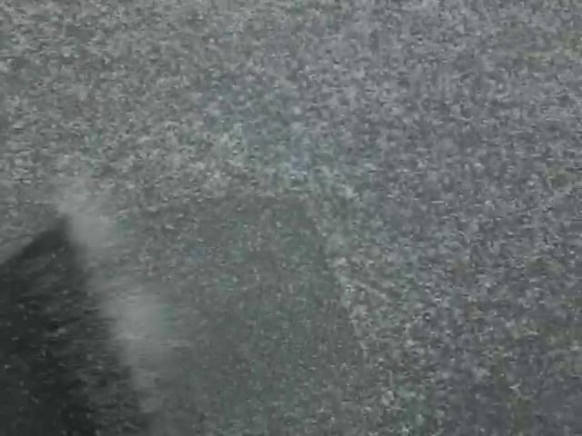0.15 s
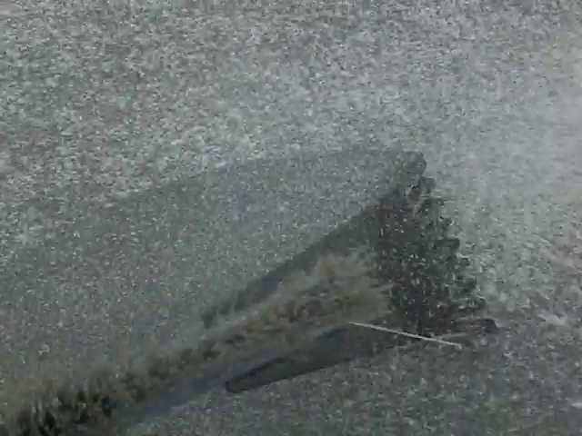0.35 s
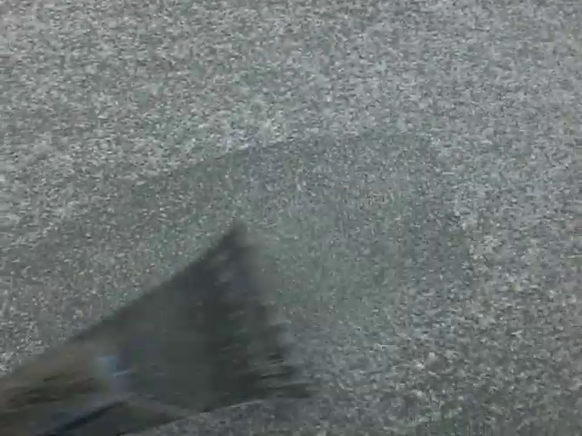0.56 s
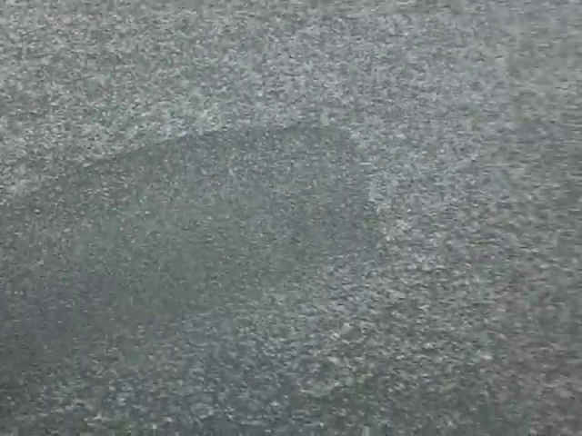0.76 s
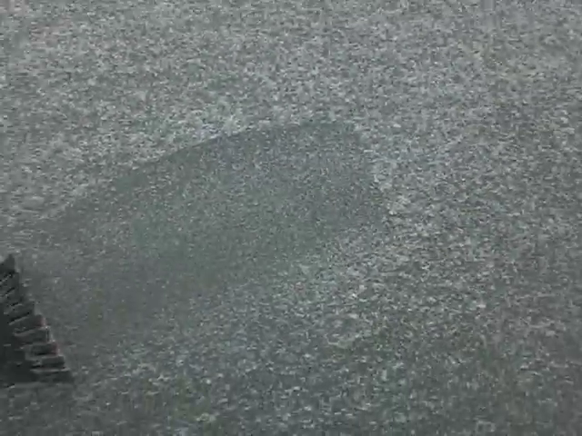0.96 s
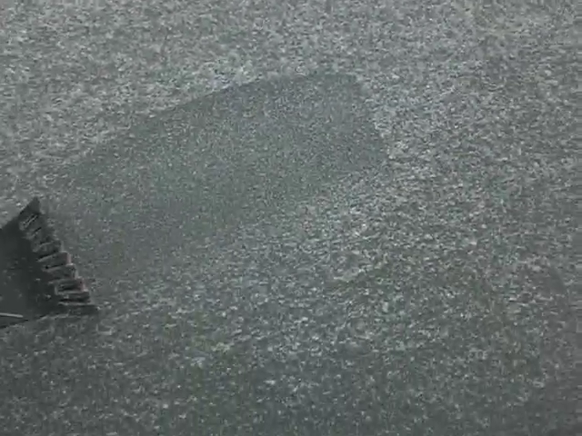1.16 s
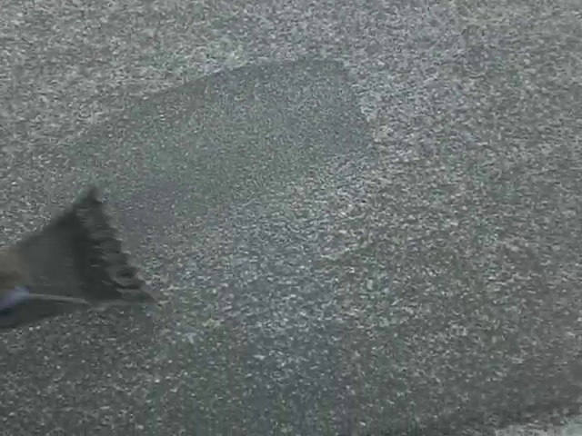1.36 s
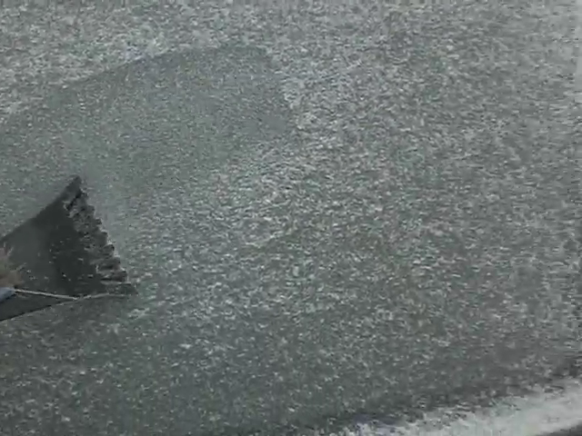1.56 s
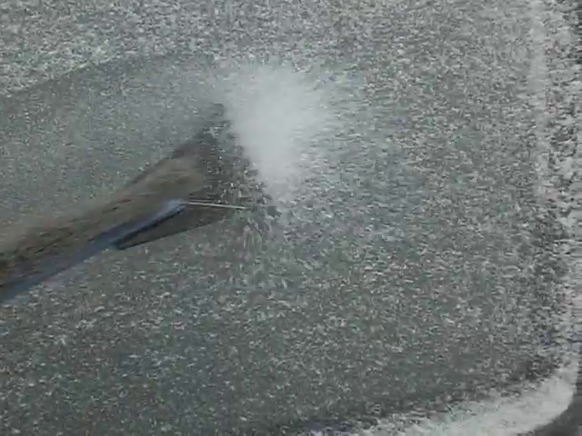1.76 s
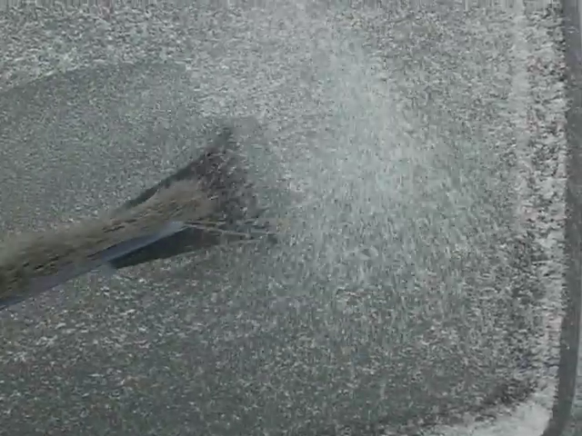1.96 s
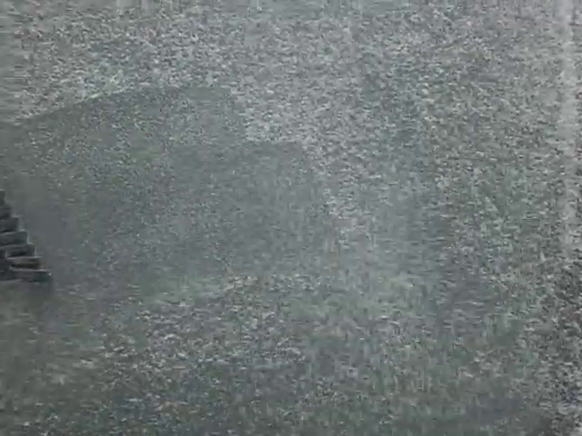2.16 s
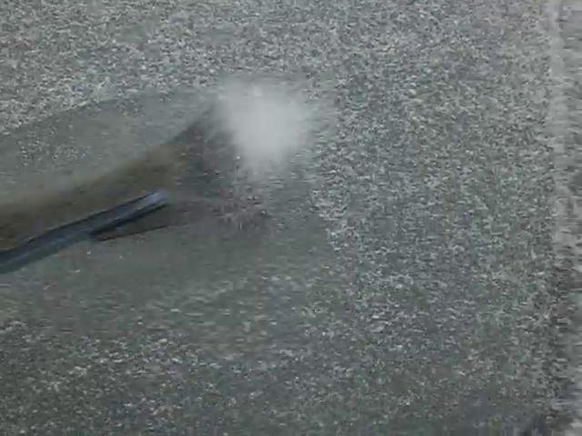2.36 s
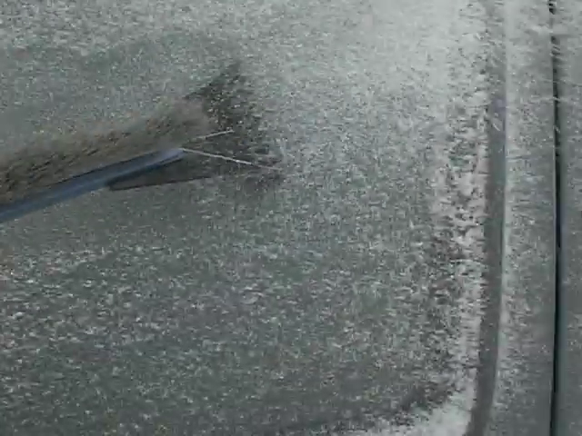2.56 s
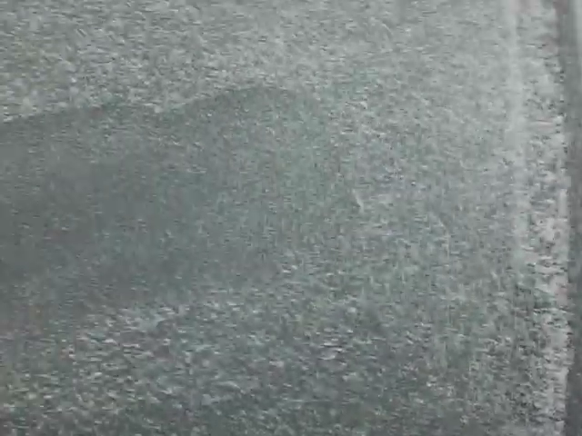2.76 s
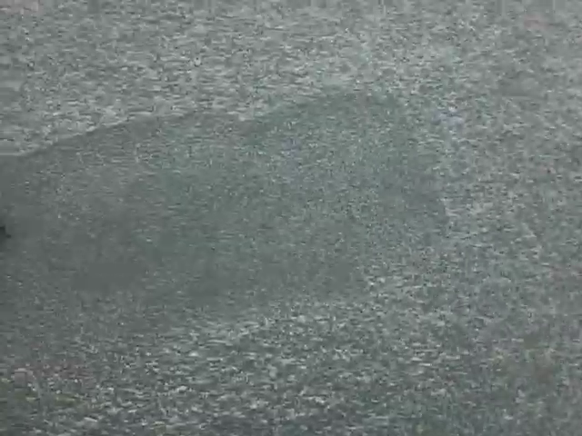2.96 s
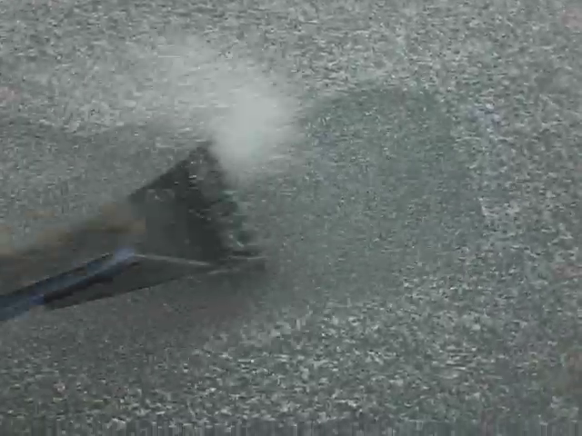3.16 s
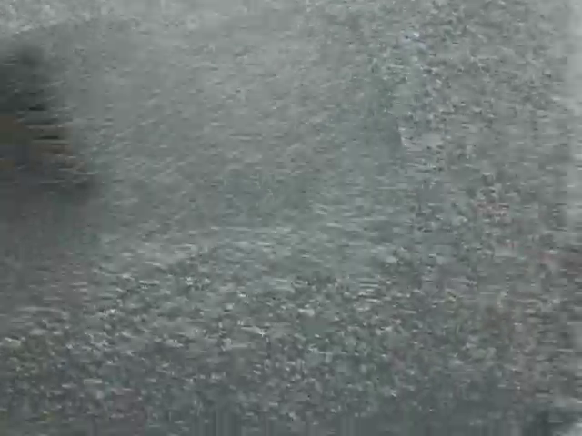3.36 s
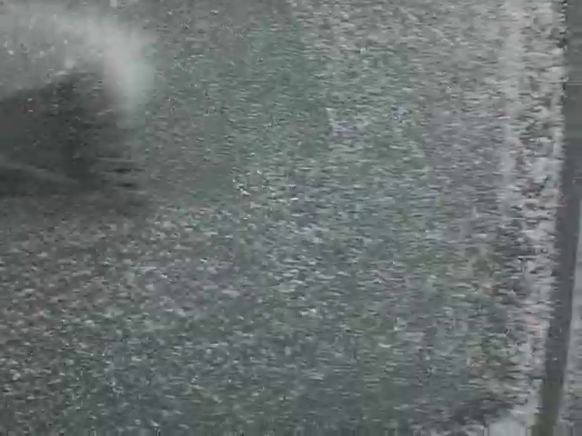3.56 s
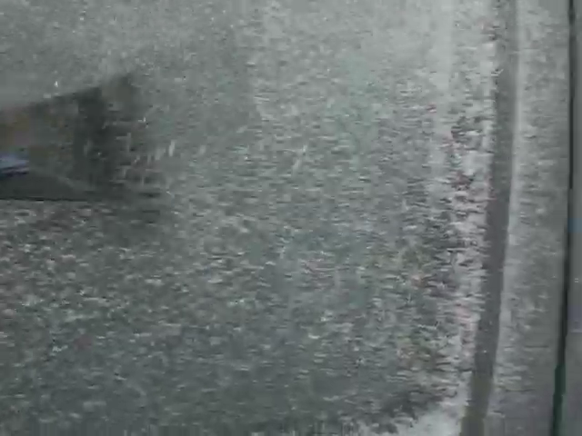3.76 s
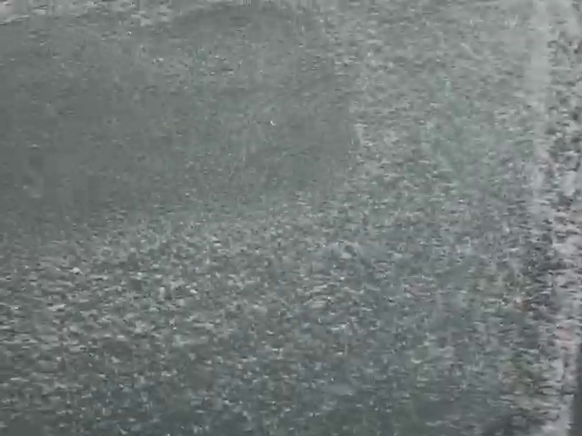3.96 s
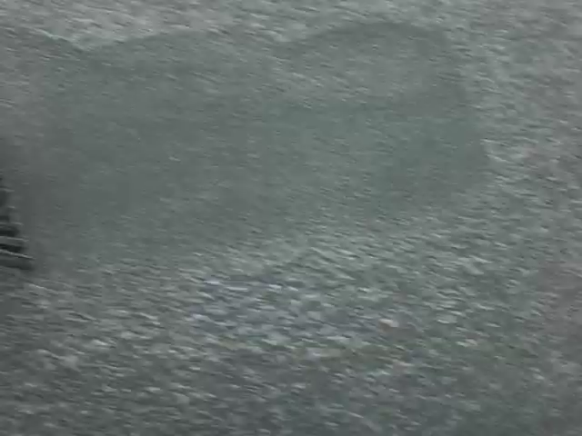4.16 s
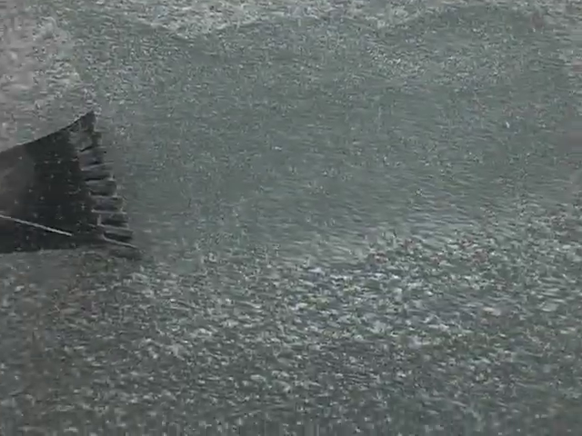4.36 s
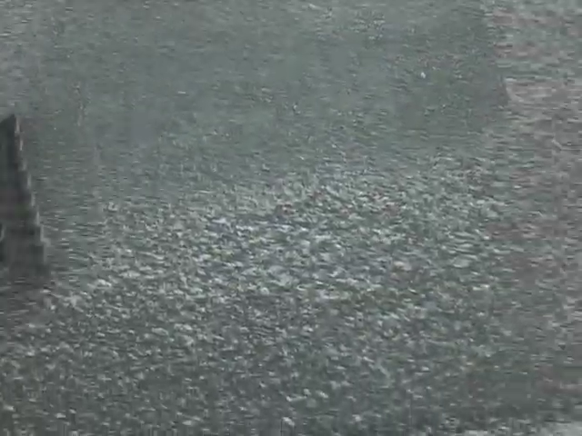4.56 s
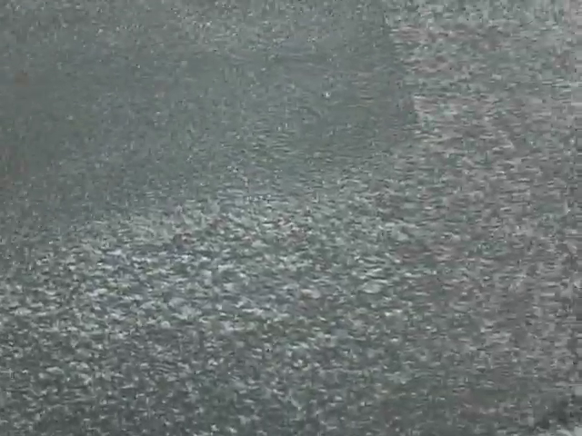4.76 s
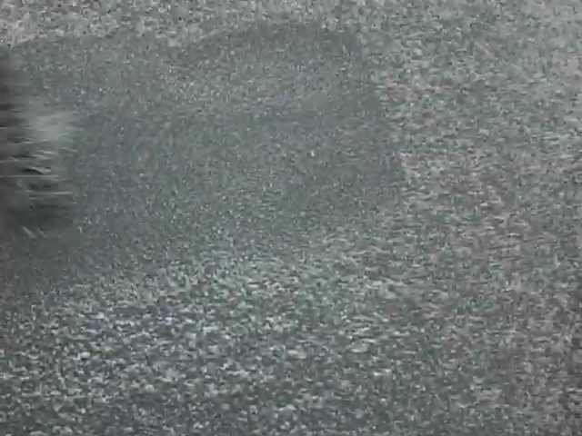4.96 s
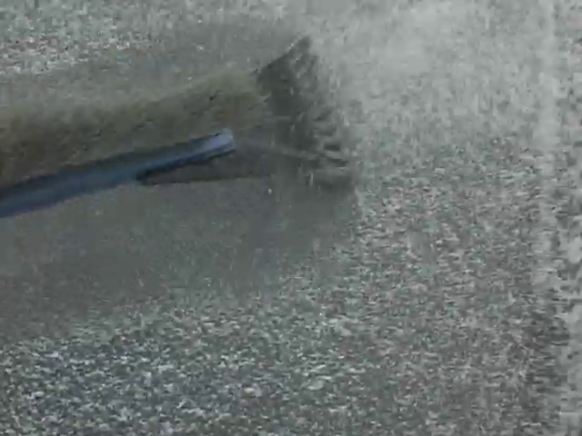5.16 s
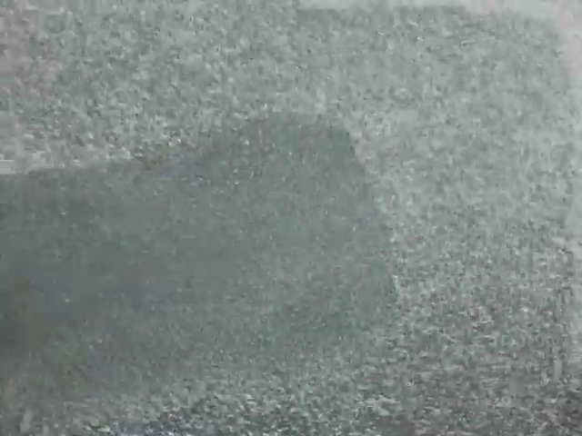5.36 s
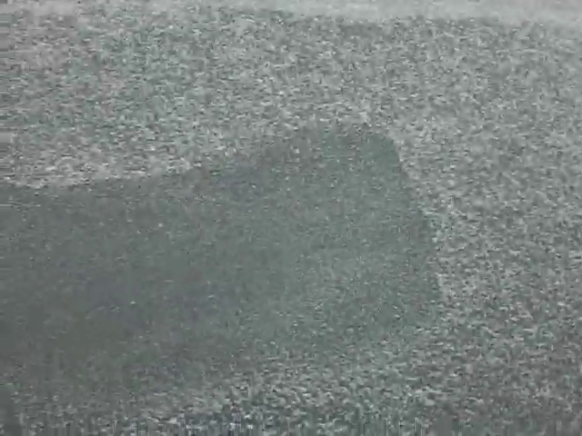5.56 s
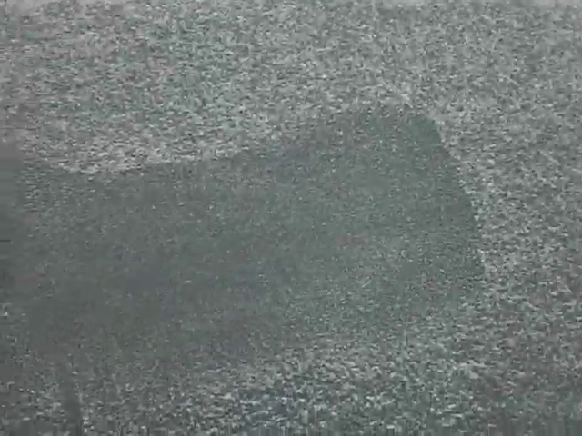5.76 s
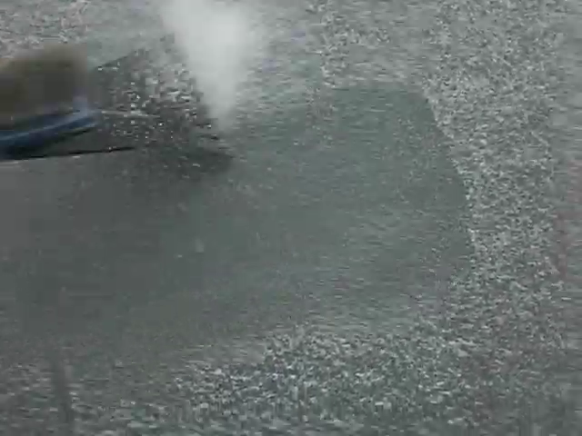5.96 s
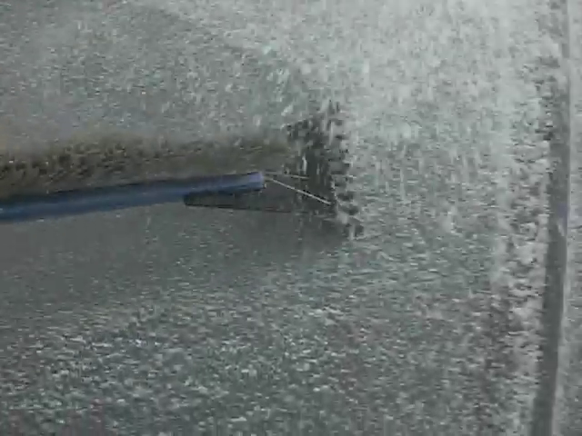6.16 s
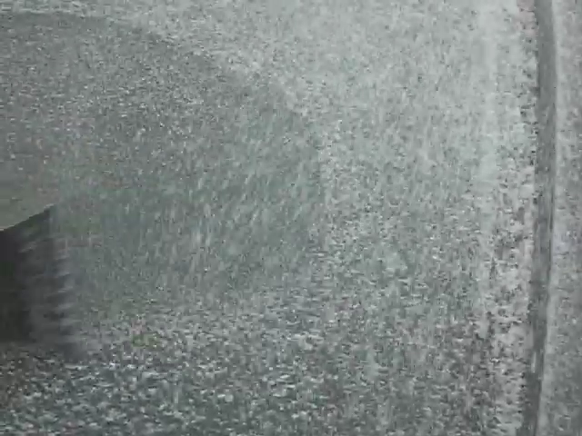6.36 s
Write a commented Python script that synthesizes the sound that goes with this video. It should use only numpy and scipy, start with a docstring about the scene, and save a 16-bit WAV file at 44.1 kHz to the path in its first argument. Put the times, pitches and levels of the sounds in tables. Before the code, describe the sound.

A plastic ice scraper is pushed and dragged over a frozen car window, close to the microphone. Each stroke is a bright, crackling rasp with a slight ring from the blade and a low thrum from the glass. The strokes come in quick groups, and in the pauses the blade skids, bounces and taps on the pane. A few tiny ice chips tick down over a faint outdoor hush.

```python
"""Scraping frost off a car window

A plastic blade is pushed and dragged over the frost, close to the microphone. Breaking crystals
crackle and set the blade and the pane ringing. Between strokes the blade skids, bounces and taps
on the glass and a few chips of ice drop, over a quiet outdoor hush."""
import sys
import numpy as np
from scipy import signal
from scipy.fft import rfft, irfft
from scipy.io import wavfile
from scipy.ndimage import uniform_filter1d

SR = 44100
rng = np.random.default_rng(int(sys.argv[2]) if len(sys.argv) > 2 else 0)


def put_to_file(sound):
    """Save the sound as 16-bit audio at rate SR, in the file named by the first command-line argument."""
    columns = np.atleast_2d(sound).T  # one column per channel
    safe = np.clip(columns, -1, 1)
    whole_steps = np.round(safe * 32767)
    wavfile.write(sys.argv[1], SR, whole_steps.astype(np.int16))


N = 282240
T = np.arange(N) / SR

# bright tone of breaking frost: (frequency [Hz], level per Hz [dB])
FROST_SPECTRUM = [(300, -16), (1500, -9), (2500, -5.5), (3400, -14), (5500, -8), (7500, -6.5), (9000, -6.5),
                  (10300, -9.5), (11500, -3.5), (14500, -1.5), (15600, 0.5)]
def scraper():
    """Crystals break as dense clicks of uneven size along the edge and drive blade and pane."""
    breaks = rng.random(N) < 24000 / SR
    sizes = evened(breaks * gain_of(3.26 * np.minimum(rng.exponential(1, N), 3)))
    bounce_force, push = bounces()
    force = bounce_force + strokes()
    clicks = sizes * rng.choice([-1., 1.], (6, N))
    clicks[0] = swish(clicks[0], depth_db=2.0)
    crackle, edge, corner, blade, pane, thrum = force * clicks
    blade_hz, pane_hz = pitches()
    plastic = blade_ring(edge, corner, blade, blade_hz)
    glass = pane_ring(pane + push[0], thrum + push[1], pane_hz)
    frost = colour(crackle + dust(force[0]), FROST_SPECTRUM)
    return gain_of(5.5) * frost + plastic + glass


# voicing of each stroke: (direction, lag along RING_SENDS [exponent], edge trim [dB], corner trim [dB],
# blade trim [dB], pane trim [dB], blade start pitch [Hz], blade end pitch [Hz], pane pitch [Hz])
STROKES = [("pull", 0.5, -16.5, 2, 1.8, 5, 2480, 2500, 855), ("push", 0.88, -4, 0, 2.2, 0, 2000, 2680, 903),
           ("pull", 1.3, -1.7, 0, 7.1, 6.4, 2630, 2650, 920),
           ("push", 0.6, 5, 3.8, -8.5, 0, 2300, 2870, 933),
           ("pull", 1.2, 0, -1.8, -2, 1.8, 2850, 2600, 830),
           ("push", 0.86, 2.4, 0, -8, -2.2, 2430, 3000, 930),
           ("pull", 1.1, 3.2, 0, -1.8, -2.5, 2860, 2230, 900),
           ("push", 0.61, 0, -2, 0, 0.74, 2460, 2370, 866), ("pull", 0.96, 0, 0, 0, 1.84, 2540, 2460, 760),
           ("push", 1.23, 0, 0, -0.5, 0, 2700, 2400, 970), ("pull", 0.97, 0, 2.3, 1, -2.5, 2420, 2490, 980),
           ("pull", 0.81, -5, 0, -5.5, 5.8, 3600, 2000, 730),
           ("pull", 1.8, -8, 5.7, 3, 13, 2300, 2800, 790),
           ("push", 0.89, -9, 0.88, 2.3, 4.6, 1770, 2720, 784),
           ("pull", 0.88, 0, 0.98, 0, 0, 2500, 2430, 857),
           ("push", 0.37, -3.5, -2.1, 0.67, -4.5, 2520, 2480, 830),
           ("pull", 1.1, 0, 0, 4.4, -4, 2560, 2430, 1060)]
# how hard the edge bites the frost, one envelope a stroke: (time [s], level [dB])
BITE_ENVELOPES = [
    [(0.0, -21.5), (0.024, -27.5), (0.064, -29), (0.082, -61)],
    [(0.088, -45), (0.1, -30), (0.112, -21), (0.22, -20.5), (0.292, -16.5), (0.348, -14), (0.39, -23.5),
     (0.4, -89)],
    [(0.43, -52), (0.466, -35.5), (0.544, -23.5), (0.558, -26), (0.596, -25), (0.668, -26), (0.755, -27.5),
     (0.772, -62), (0.787, -26)],
    [(1.634, -18.5), (1.678, -19), (1.722, -20), (1.754, -17.5), (1.858, -17.5), (1.88, -20.5),
     (1.886, -34)],
    [(1.93, -44), (2.016, -27.5), (2.128, -26.5), (2.156, -22.5), (2.202, -31), (2.22, -45), (2.226, -40)],
    [(2.247, -25), (2.258, -20.5), (2.3, -19), (2.34, -17), (2.39, -19), (2.424, -15.5), (2.496, -14.5),
     (2.522, -19.5)],
    [(2.565, -41.5), (2.619, -24.5), (2.655, -21), (2.809, -24.5), (2.849, -33), (2.863, -53)],
    [(3.077, -15.5), (3.125, -21.5), (3.173, -19), (3.219, -18.5), (3.24, -21.5), (3.28, -37.5),
     (3.31, -66)],
    [(3.312, -45), (3.335, -32.5), (3.365, -24), (3.431, -23.5), (3.477, -28), (3.495, -61)],
    [(3.497, -43.5), (3.512, -19.5), (3.541, -21), (3.643, -16.5), (3.699, -19.5), (3.721, -64)],
    [(3.728, -36), (3.781, -23.5), (3.869, -27.5), (3.899, -23.5), (3.939, -21.5), (3.957, -25.5),
     (3.975, -45)],
    [(4.49, -96), (4.524, -55), (4.598, -44.5), (4.65, -25), (4.694, -25.5), (4.726, -94)],
    [(4.732, -54), (4.767, -41), (4.821, -54), (4.845, -43), (4.877, -69)],
    [(4.882, -46), (4.893, -34), (4.905, -22.5), (4.947, -22), (4.973, -24.5), (5.047, -18), (5.155, -20),
     (5.185, -58)],
    [(5.186, -42), (5.2, -27.5), (5.226, -21), (5.302, -22.5), (5.328, -23.5), (5.4, -22.5), (5.474, -25),
     (5.504, -46)],
    [(5.885, -18), (5.981, -17.5), (6.063, -13.5), (6.149, -25.5), (6.181, -16.5), (6.201, -32.5),
     (6.215, -80)],
    [(6.218, -60), (6.245, -32), (6.304, -34.5), (6.332, -27), (6.4, -25.5)],
]
# low thrum of the whole pane, one envelope a stroke: (time [s], level [dB])
THRUM_ENVELOPES = [
    [(0.0, -49), (0.034, -45), (0.08, -49), (0.085, -45)],
    [(0.09, -30.5), (0.102, -35.5), (0.392, -44), (0.42, -49)],
    [(0.43, -53), (0.46, -59), (0.484, -53), (0.775, -50)],
    [(1.634, -27), (1.738, -37), (1.748, -38), (1.89, -36)],
    [(1.93, -49), (1.948, -58), (2.22, -48), (2.23, -40)],
    [(2.243, -32), (2.293, -22.5), (2.419, -49), (2.525, -38)],
    [(2.565, -56), (2.685, -50), (2.793, -61), (2.863, -47)],
    [(3.077, -38), (3.103, -38), (3.287, -43), (3.31, -52)],
    [(3.315, -51), (3.433, -53), (3.495, -39)],
    [(3.5, -40), (3.546, -31), (3.588, -45), (3.722, -47)],
    [(3.728, -50), (3.884, -57), (3.966, -46), (3.975, -30)],
    [(4.49, -62.5), (4.662, -30.5), (4.72, -49), (4.727, -41)],
    [(4.732, -45), (4.736, -48), (4.874, -43), (4.878, -39)],
    [(4.882, -30), (4.936, -33.5), (4.978, -48), (5.185, -41.5)],
    [(5.19, -56), (5.272, -56), (5.344, -54), (5.505, -45)],
    [(5.885, -38), (6.055, -59), (6.197, -44), (6.215, -51)],
    [(6.222, -57), (6.302, -43), (6.328, -59), (6.4, -49)],
]
# ring levels relative to the bite, for push and pull:
# (progress [0-1], edge [dB], corner [dB], blade [dB], pane [dB])
RING_SENDS = {"push": [(0, -16.5, -5, -11.5, -8.5), (.15, -16, -10.5, -15.5, -12),
              (.35, -3, -7, -14.5, -10), (.6, 0, -9.5, -11.5, -9), (.85, -3, -13.5, -6.5, -14),
              (1, -6, -12.5, -5.5, -12.5)], "pull": [(0, 0.5, -9, -8.5, -22.5), (.3, 2, -3.5, -6, -16),
              (.6, -3.5, -3.5, -2.5, -10), (.85, -17.5, -7.5, -6, -12), (1, -10.5, -8, -6.5, -7)]}
LIGHT_DB, PANE_KEPT = -26.5, 0.34  # under this bite, the blade's weight keeps this share of each lost dB
CHATTER_FROM_DB, CHATTER_DEPTH, CHATTER_HZ = -29.5, 2, 108  # a loud thrum shakes the edge off the glass
HOP_DB, LANDING_S = {"push": 7.5, "pull": 9.5}, 0.002  # the blade hops as it digs in
def strokes():
    """The edge sticks and slips: force for six feeds (crackle, edge, corner, blade, pane, thrum)."""
    force = np.zeros((6, N))
    for (direction, lag, *voicing), bite, thrum in zip(STROKES, BITE_ENVELOPES, THRUM_ENVELOPES):
        t = np.arange(bite[0][0], bite[-1][0], 1 / SR)
        age, progress = t - t[0], np.linspace(0, 1, len(t))
        bite_db = np.interp(t, *np.transpose(bite))
        thrum_db = np.interp(t, *np.transpose(thrum))
        marks, *sends_db = np.transpose(RING_SENDS[direction])
        edge, corner, blade, pane = [bite_db + np.interp(progress ** lag, marks, send) + trim
                                     for send, trim in zip(sends_db, voicing[:4])]
        pane += PANE_KEPT * np.maximum(LIGHT_DB - bite_db, 0)
        levels_db = np.array([bite_db, edge, corner, blade, pane, thrum_db])
        chatter_db = CHATTER_DEPTH * np.maximum(thrum_db - CHATTER_FROM_DB, 0)
        levels_db[:5] += chatter_db * (.6 - 2 * (CHATTER_HZ * age % 1))  # a sudden catch, then slack
        hop_db = HOP_DB[direction] * np.exp(-age / 0.02) * np.cos(2 * np.pi * 78 * age)
        add(force, t[0], gain_of(levels_db + hop_db) * np.minimum(age / LANDING_S, 1))
    judder_db = 0.2 * drift(low_hz=40.6, high_hz=110) + 1.7 * drift(low_hz=150.7, high_hz=490)
    # uneven frost favours now one ring, now another
    patchy_db = [1.22 * drift(low_hz=7.3, high_hz=41.6) for _ in force]
    return force * gain_of(judder_db + np.array(patchy_db))


def pitches():
    """The blade's pitch bends through each stroke; the pane under it wanders about its own."""
    times = np.ravel([(bite[0][0], bite[-1][0]) for bite in BITE_ENVELOPES])
    blade_hz = np.ravel([stroke[-3:-1] for stroke in STROKES])
    pane_hz = np.repeat([stroke[-1] for stroke in STROKES], 2)
    wander_hz = 70 * drift(low_hz=3.1, high_hz=15)
    return np.interp(T, times, blade_hz), np.interp(T, times, pane_hz) + wander_hz


def swish(x, depth_db):
    """Bands of the spectrum swell and fade in drifting patches as the edge tilts."""
    bands = signal.stft(x, SR, nperseg=256)[2]
    patches = uniform_filter1d(rng.standard_normal(bands.shape), size=6, axis=0)
    patches = uniform_filter1d(patches, size=24, axis=1)
    return signal.istft(bands * gain_of(depth_db * evened(patches)), SR, nperseg=256)[1][:N]


# plastic resonances of edge, corner and blade body: (frequency [Hz], width [Hz], level [dB])
EDGE_MODES = [(6330, 83, -6.5), (6440, 290, 7), (6960, 170, -8), (8100, 100, -13), (13600, 660, 3)]
CORNER_MODES = [(4140, 820, -1.5), (4610, 220, 3.5), (5150, 500, -7), (13600, 300, 3)]
BLADE_MODES = [(2400, 250, -6), (2790, 60, -3)]
def blade_ring(edge, corner, blade, pitch_hz):
    """The plastic rings in steady modes, plus one that bends with pressure."""
    sizzle = gain_of(-2.5) * ring(edge, EDGE_MODES) + gain_of(2.25) * ring(corner, CORNER_MODES)
    body = gain_of(-2.5) * ring(blade, BLADE_MODES)
    return sizzle + body + gain_of(-1.5) * glide(blade, pitch_hz, width_hz=168)


# the window's midrange ring and low thrum: (frequency [Hz], width [Hz], level [dB])
PANE_MODES = [(265.4, 23, -19.5), (372, 74, -8), (527, 74, -1.5), (739, 77, -4), (901, 82, -4.5),
              (1210, 110, 1.5), (1366, 160, -1.5), (1930, 400, -0.5)]
THRUM_MODES = [(49.6, 36, -0.5), (82.4, 8.2, -8.5), (96, 24, 3), (113.2, 60, 5.5), (182.3, 73, -1),
               (244.4, 44, -6)]
def pane_ring(pane, thrum, pitch_hz):
    """The glass rings and thrums as a whole, with one wandering mode under the blade."""
    body = gain_of(0.3) * ring(pane, PANE_MODES) + gain_of(3.5) * ring(thrum, THRUM_MODES)
    return body + gain_of(-4.0) * glide(pane, pitch_hz, width_hz=49)


# short slides between bounces: (time [s], bite [dB], load on the glass [dB], contact [s])
SKIDS = [(0.787, -9, -23, 0.0037), (0.8002, -6, -28, 0.0056), (0.8102, -9, -27, 0.0044),
         (0.8235, -6.5, -29.5, 0.003), (0.9727, -10.5, -31.5, 0.0047), (1.0673, -10.5, -29, 0.0036),
         (1.3444, -26.5, -26, 0.012), (1.3577, -22, -39, 0.013), (1.368, -13.5, -36, 0.0038),
         (1.4441, -12, -27.5, 0.011), (1.4523, -8.5, -37, 0.012), (1.4676, -14, -30.5, 0.0091),
         (1.4807, -7.5, -26.5, 0.0053), (1.4944, -11, -33, 0.0098), (1.5734, -9, -25.5, 0.0063),
         (1.5877, -9.5, -24.5, 0.01), (1.6009, -8, -26, 0.017), (1.6105, -10.5, -25.5, 0.011),
         (1.6235, -6, -28, 0.0066), (1.886, -6.5, -44, 0.008), (1.8981, -13, -27, 0.005),
         (2.2382, -17.5, -28, 0.0065), (2.5234, -10, -42, 0.0093), (2.5383, -19.5, -34, 0.0094),
         (2.8691, -13.5, -27, 0.0064), (2.8789, -9, -25, 0.011), (2.8966, -5, -27, 0.0087),
         (2.9068, -18, -31, 0.008), (2.96, -35.5, -46, 0.0077), (3.04, -7.5, -24.5, 0.0041),
         (3.0531, -6, -22.5, 0.0083), (3.067, -6, -26, 0.008), (3.9827, -13.5, -23.5, 0.0083),
         (3.9891, -7.5, -28, 0.0054), (4.7022, -12.5, -45, 0.0019), (4.785, -25.5, -35, 0.0045),
         (5.5205, -8, -20.5, 0.0057), (5.5342, -12, -26, 0.004), (5.5938, -10, -26.5, 0.0038),
         (5.875, -7, -21, 0.0059)]
# knocks of the edge on the glass: (time [s], blow [dB], load on the glass [dB])
TAPS = [(0.9573, -14, -30), (0.9872, -16, -28), (0.9962, -26, -51), (1.0834, -12, -35), (1.333, -25, -37),
        (1.3386, -5.5, -20), (1.5097, -19, -39), (2.112, -9.5, -29), (2.121, -17, -30.5),
        (4.0456, -16, -35), (5.511, -15, -22), (5.547, -15, -44), (5.559, -26, -43), (5.568, -12, -29),
        (5.574, -16, -25), (5.5828, -6, -25), (5.605, -16, -24), (5.6142, -9, -25), (5.6314, -30, -40),
        (5.6353, -19.5, -36), (5.6666, -10, -21.5), (5.6819, -8, -25), (5.6918, -15, -36),
        (5.6997, -20, -39), (5.708, -23, -48), (5.715, -16, -25.5), (5.7334, -19, -31), (5.7504, -34, -43),
        (5.769, -27.5, -32), (5.7893, -12, -39), (5.7978, -13, -25), (5.8171, -12.5, -23),
        (5.843, -28, -46), (5.8628, -6.5, -19)]
RATTLE_T60_S, LIGHT_BLOW_HZ = 0.015, 150
def bounces():
    """Skids and taps give a burst of force to the six feeds and a single push to pane and thrum."""
    force, push, t = np.zeros((6, N)), np.zeros((2, N)), T[:SR // 8]
    blow = np.pad(np.hanning(44), (0, 46))
    rebound = 9 * np.gradient(np.hanning(90))  # in and out again: favours the upper thrum modes
    for start, db, load_db, contact_s in SKIDS:
        attack = np.minimum(t / 0.00035, 1)
        slide = attack * gain_of(-500 * t - 60 * np.maximum(t - contact_s, 0) / 0.0037)
        feeds = gain_of([db - 8.5, db - 15.5, db - 18.5, db - 26, load_db - 3, load_db - 5])
        add(force, start, np.outer(feeds, slide))
        add(push, start, gain_of([[load_db - 7], [load_db + 1]]) * [blow, rebound])
    tick = 2.5 * gain_of(-60 * t / .003)  # the sharp first contact
    rattle = gain_of(-60 * t / RATTLE_T60_S)
    for start, db, load_db in TAPS:
        feeds = gain_of([db - 13.5, db - 29, db - 23.5, db - 27, load_db - 13.5, load_db - 41])
        add(force, start, np.outer(feeds, tick + rattle))
        add(push, start, gain_of([[load_db - 13], [load_db - 6.5]]) * [blow, rebound])
    # a bounce is too brief to move the lowest modes
    push[1] = signal.sosfilt(signal.butter(2, LIGHT_BLOW_HZ, "highpass", fs=SR, output="sos"), push[1])
    return force, push


def dust(force):
    """Loosened frost keeps trickling down the pane in faint puffs after each contact."""
    airborne = signal.fftconvolve(force, gain_of(-60 * T[:SR // 2] / 0.47) / 2500)[:N]
    puffs = gain_of(6 * drift(low_hz=15, high_hz=90))
    return gain_of(-33.0) * airborne * puffs * rng.standard_normal(N)


# loose bits of ice dropping: (time [s], peak [dB], pitch [Hz])
CHIPS = [(1.23, -48, 13300), (1.246, -45, 9500), (4.225, -40, 1240), (4.316, -33, 5500), (4.351, -61, 1040),
         (4.496, -39, 1460), (4.533, -34, 11900)]
def chips():
    """Each chip lands with a tiny, quickly damped tick."""
    ticks, t = np.zeros(N), T[:400]
    for start, db, hz in CHIPS:
        add(ticks, start, gain_of(db - 60 * t / 0.004) * np.sin(2 * np.pi * hz * t))
    return ticks


# short outdoor reverb: (frequency [Hz], time to fall 60 dB [s])
YARD_DECAY = [(100, 0.19), (300, 0.42), (700, 0.14), (2000, 0.085), (6000, 0.081), (13000, 0.026)]
def yard(x):
    """Sound scatters off car body and ground, each band dying at its own speed."""
    hz, t, bands = signal.stft(rng.standard_normal(SR // 2), SR, nperseg=256)
    decay = gain_of(-60 * t / curve_at(YARD_DECAY, hz)[:, None])
    tail = signal.istft(bands * decay, SR, nperseg=256)[1]
    return signal.fftconvolve(x, tail / np.linalg.norm(tail))[:N]


# dark outdoor bed: (frequency [Hz], level per Hz [dB])
HUSH_SPECTRUM = [(18, -26.5), (30, 7.5), (53, -5.5), (130, -15), (240, -16), (380, -21.5), (855, -22),
                 (1050, -20.5), (1330, -24.5), (2080, -24.5), (7500, -38), (9490, -39), (10800, -43.5),
                 (15600, -35.5)]
def hush():
    """Distant traffic and air, swelling a little."""
    level_db = -58 + 1.5 * drift(low_hz=4.1, high_hz=30)
    return gain_of(level_db) * colour(rng.standard_normal(N), HUSH_SPECTRUM)


def ring(x, modes):
    """Passes x through damped modes, keeping the power of white noise."""
    t = T[:SR // 5]
    response = np.zeros_like(t)
    for k, (hz, width, db) in enumerate(modes):
        envelope = gain_of(db) * np.sqrt(width) * np.exp(-np.pi * width * t)
        response += (-1) ** k * envelope * np.sin(2 * np.pi * hz * t)
    return signal.oaconvolve(x, response / np.linalg.norm(response))[:N]


def glide(x, hz, width_hz):
    """One mode that follows the curve hz, keeping the power of white noise."""
    carrier = np.exp(2j * np.pi * np.cumsum(hz) / SR)
    pole = np.exp(-np.pi * width_hz / SR)
    envelope = signal.lfilter([1], [1, -pole], x / carrier + 1e-18)
    return np.sqrt(2 * (1 - pole ** 2)) * (carrier * envelope).real


def colour(x, spectrum):
    """Equalises x, keeping the power of white noise."""
    gain = gain_of(curve_at(spectrum, np.fft.rfftfreq(N, 1 / SR)))
    return irfft(rfft(x) * evened(gain), N)


def drift(low_hz, high_hz):
    """Random modulation between two rates, rms 1."""
    band = signal.butter(2, [low_hz, high_hz], "bandpass", fs=SR, output="sos")
    return evened(signal.sosfilt(band, rng.standard_normal(N)))


def gain_of(db):
    return 10 ** (np.asarray(db) / 20)


def evened(x):
    return x / np.sqrt(np.mean(x ** 2) + 1e-20)


def curve_at(points, hz):
    points_hz, values = np.transpose(points)
    return np.interp(np.log(hz + 1), np.log(points_hz + 1), values)


def add(mix, start_s, sound):
    part = mix[..., round(start_s * SR):][..., :sound.shape[-1]]
    part += sound[..., :part.shape[-1]]


# treble dips where neighbouring modes cancel: (frequency [Hz], width [Hz])
NOTCHES = [(7270, 180), (7880, 270)]
def scene():
    """Scraper and chips up front, faint reflections and the hush behind, in mono."""
    near = scraper() + chips()
    for hz, width in NOTCHES:
        near = 0.23 * near + 0.72 * signal.lfilter(*signal.iirnotch(hz, hz / width, SR), near)
    return (near + gain_of(-15.0) * yard(near) + hush())[None]


def record(dry):
    """A small microphone loses the deepest bass and rounds off the peaks; a steep high cut follows."""
    upper = signal.sosfilt(signal.butter(4, 92., "highpass", fs=SR, output="sos"), dry)
    thin = upper + gain_of(-17.0) * dry
    rounded = .8 * np.tanh(thin / .8)
    high_cut = signal.firwin(511, cutoff=15740, window=("kaiser", 9), fs=SR)
    return signal.oaconvolve(rounded, high_cut[None], "same")


dry = scene()
out = record(dry)
put_to_file(out)
```